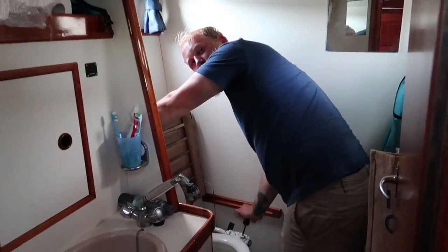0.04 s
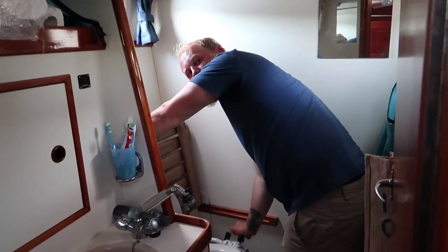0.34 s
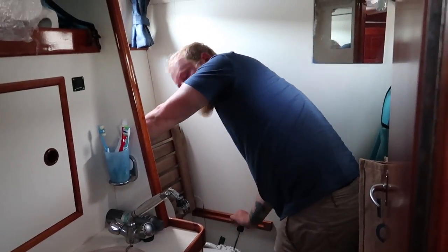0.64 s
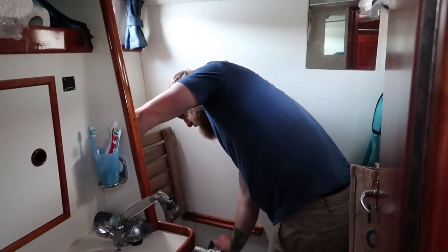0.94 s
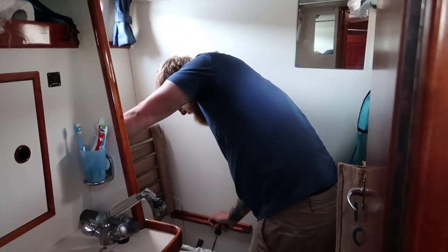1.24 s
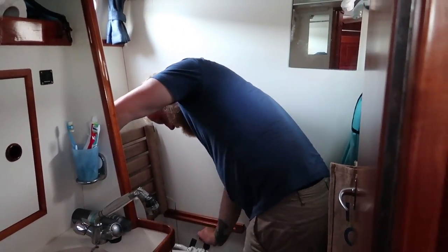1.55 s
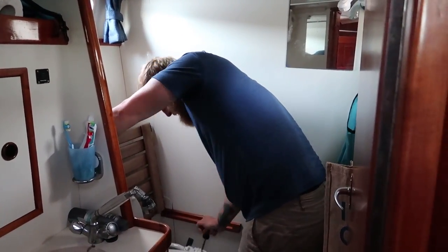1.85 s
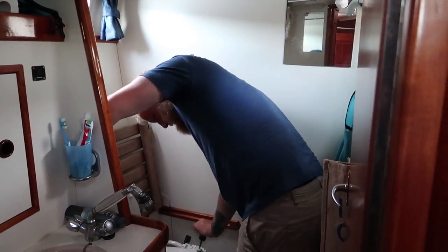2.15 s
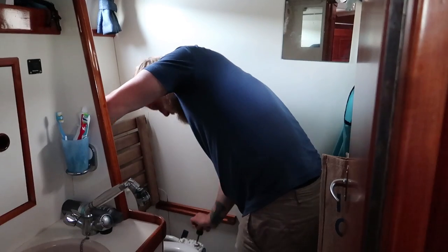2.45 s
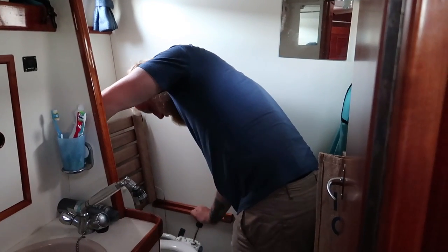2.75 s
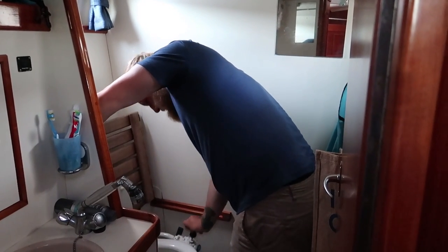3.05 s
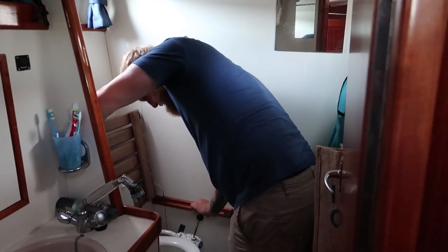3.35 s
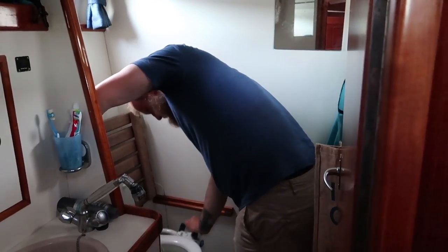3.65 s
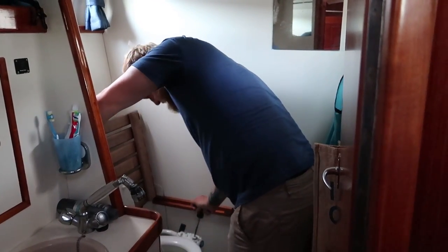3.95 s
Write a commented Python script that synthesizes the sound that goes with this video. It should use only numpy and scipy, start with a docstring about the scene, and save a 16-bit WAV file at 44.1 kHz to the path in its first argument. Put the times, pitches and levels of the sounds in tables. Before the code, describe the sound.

Rhythmic hand pumping of a boat toilet, with wet rasping squirts, slurps, glugs and dull knocks.

```python
"""The hand pump of a boat toilet is worked in a tiny cabin, about three strokes in two seconds.
A valve slurps open, then the first push squirts air and water through it with a rasp, while the
piston seal hisses with speed and water churns in the hose. A big bubble glugs, and the pull sucks
and gurgles in the bowl. Push and pull keep alternating; from the second pull on, the handle sometimes
knocks at the top or the piston thuds at the bottom, each time with a throaty gulp."""
import sys
import numpy as np
from scipy import signal
from scipy.fft import rfft, irfft
from scipy.io import wavfile

SR = 44100
rng = np.random.default_rng(int(sys.argv[2]) if len(sys.argv) > 2 else 0)


def to_wav(s):
    """Save 16-bit WAV."""
    ch = np.atleast_2d(s).T  # columns
    pcm = np.round(np.clip(ch, -1, 1) * 32767)  # PCM
    wavfile.write(sys.argv[1], SR, pcm.astype(np.int16))


N = 176400
TIME = np.arange(N) / SR
BINS_HZ = np.fft.rfftfreq(16384, 1 / SR)

# piston strokes, levels relative within a layer: start_s, fastest_s, end_s, hiss_db, squelch_db, churn_db
PUSH_STROKES = [(0.02, 0.24, 0.37, -40, -32.5, -24), (0.745, 0.992, 1.107, -41, -29.5, -28),
                (1.467, 1.639, 1.85, -40, -32, -29.5), (2.175, 2.319, 2.48, -37.5, -26, -29.5),
                (2.782, 2.987, 3.117, -37.5, -27, -23), (3.397, 3.642, 3.776, -39, -27.5, -23)]
PULL_STROKES = [(0.415, 0.614, 0.8, -43.5, -35.5, -25.5), (1.119, 1.328, 1.494, -44, -31.5, -23),
                (1.83, 2.007, 2.336, -44.5, -32, -22.5), (2.473, 2.666, 2.84, -43, -33.5, -22),
                (3.141, 3.289, 3.465, -42.5, -32, -22), (3.756, 3.964, 4.12, -42.5, -34.5, -23)]
# a valve opens and a slurp breaks through: start_s, level_db, decay_s
VALVE_SLURPS = [(0.0, -37, 0.037), (0.181, -35, 0.034), (0.493, -29.5, 0.027), (1.14, -48, 0.019),
                (1.889, -35, 0.017), (2.249, -25.5, 0.027), (2.51, -38.5, 0.032), (2.885, -31.5, 0.12),
                (3.201, -24.5, 0.017), (3.44, -33, 0.05), (3.809, -30, 0.062)]
# big bubbles in the bowl: loudest_s, length_s, level_db
BOWL_GLUGS = [(0.344, 0.01, -20), (0.55, 0.038, -17), (0.648, .026, -19.5), (0.704, 0.036, -19),
              (1.054, 0.029, -16.5), (1.296, 0.021, -7), (1.752, 0.038, -17.5), (2.215, 0.017, -19.5),
              (2.628, 0.037, -14.5), (3.046, 0.023, -26), (3.845, 0.015, -7)]
# slugs of water heave through the outlet hose: loudest_s, level_db
HOSE_HEAVES = [(.495, -15), (1.279, -23), (1.648, -17), (3.264, -16.5)]
# the handle meets the top stop: start_s, knock_db, click_db
HANDLE_KNOCKS = [(1.4, -12.5, -35), (2.082, -12.5, -31), (2.729, -14.5, -30.5)]
# the piston lands at the bottom: start_s, level_db
PISTON_THUDS = [(2.389, -10.5), (3.707, -15.5)]

# narrow rings of pump barrel and pipe: pitch_hz, width_hz, boost_db
PIPE_RINGS = [(625, 60, 7.5), (775, 32, 10), (1026, 24, 14), (1125, 34, 10), (1742, 24, 6.5), (2358, 26, 8)]
# modes of water, bowl and hose, and of the pump housing on its shelf: pitch_hz, width_hz, level_db
BOWL_MODES = [(94.3, 4.8, -8), (139, 45, -7.5), (173, 15.3, -4), (266, 12.5, -4), (337, 14.5, -9.5),
              (389.2, 19.3, -2), (421.5, 7.3, 0), (782.8, 24, -10.5)]
HOUSING_MODES = [(97, 14.4, 21), (256, 11, 14.5), (313, 14, 16), (647, 125, 6.5), (702, 11, 8.5)]

# tone curves of the valves, seal, hull, stops and background: frequency_hz, level_db
PUSH_SQUELCH_EQ = [(100, -43), (480, -10.5), (650, 5), (900, -5), (1200, -5), (1550, -9.5), (2600, -11),
                   (4500, -22), (9000, -50)]
PULL_SQUELCH_EQ = [(100, -5.5), (480, -7.5), (650, 5), (880, -6.5), (1200, 0), (1550, -5.5), (2600, -19.5),
                   (4500, -24), (9000, -34.5), (15000, -46)]
PUSH_HISS_EQ = [(100, -36), (900, 3.5), (2000, -2.5), (3300, -4.5), (5000, -9.5), (8000, -20), (12000, -25),
                (14000, -33), (15500, -77)]
PULL_HISS_EQ = [(100, -23), (900, 2.5), (2000, 5), (3300, 1.5), (5000, -5), (8000, -14), (12000, -17.5),
                (14000, -26), (15500, -48)]
HULL_RUMBLE_EQ = [(30, -16.5), (70, -3.5), (110, 5.5), (500, -53)]
KNOCK_EQ = [(40, -34), (110, 16.5), (260, -2.5), (420, 4), (500, -3), (700, 6.5), (1000, -7), (1500, -25.5),
            (6000, -47)]
CLICK_EQ = [(200, -41), (1200, 1.5), (4500, -5.5), (15000, -53)]
ROOM_TONE_EQ = [(40, -1.5), (100, 2.5), (200, 1), (500, -9), (1000, -18.5), (3000, -30.5), (12000, -45.5),
                (15000, -74)]
# spread between the ears: frequency_hz, side_minus_mid_db
STEREO_WIDTH = [(70, -57), (330, -23), (650, -28), (1300, -22), (2800, -14), (5500, -8), (9000, -3)]

TREBLE_EDGE_HZ = 15100


def amp(db):
    """Decibels to gain."""
    return 10 ** (np.asarray(db) / 20)


def unit(x):
    """Scales to rms 1."""
    return x / np.sqrt(np.mean(x ** 2) + 1e-20)


def eq(points):
    """Gain per frequency along a tone curve."""
    hz, db = np.transpose(points)
    return amp(np.interp(np.log(BINS_HZ + 1), np.log(hz), db))


def bell(hz, width_hz):
    """Gain per frequency of one resonance."""
    return 1 / np.hypot(1, (BINS_HZ ** 2 - hz ** 2) / (width_hz * BINS_HZ + 1e-9))


def body(modes, top_hz):
    """Gain per frequency of a resonant body: peaks with dark valleys between, fading above top_hz."""
    power = sum(amp(db) ** 2 * bell(hz, 1.4 * width) ** 3 for hz, width, db in modes)
    return np.sqrt(power) / (1 + (BINS_HZ / top_hz) ** 2)


def colour(x, gain):
    """Plays x through a minimum-phase filter of unit energy, shaped like the gain curve."""
    log_gain = np.log(np.maximum(gain / gain.max(), 1e-5))
    mirrored = np.r_[log_gain, log_gain[-2:0:-1]]
    ring = np.fft.ifft(np.exp(np.conj(signal.hilbert(mirrored)))).real[:len(BINS_HZ)]
    return signal.fftconvolve(x, ring / np.linalg.norm(ring))[:N]


def drift(up_to_hz):
    """Smooth random modulation of rms 1."""
    slow = np.fft.rfftfreq(N, 1 / SR) < up_to_hz
    return unit(irfft(rfft(rng.standard_normal(N)) * slow, N))


def pops(per_s, spread_db):
    """A random crackle of bursting bubbles of uneven size."""
    size = amp(spread_db * np.minimum(rng.exponential(1, N), 3))
    return unit(size * rng.choice([-1, 1], N) * (rng.random(N) < per_s / SR))


def flow(strokes, layer, power, late_s, early_s, skew, surge_db=0):
    """A layer's envelope follows a power of the piston's speed; surge_db sharpens the mid-stroke peak."""
    column = ("hiss", "squelch", "churn").index(layer)
    envelope = np.zeros(N)
    for start, fastest, end, *levels_db in strokes:
        travel = np.interp(TIME, [start + late_s, fastest, end - early_s], [0, .5, 1])
        speed = np.abs(np.sin(np.pi * travel ** skew))
        envelope += amp(levels_db[column] - surge_db * np.abs(2 * travel - 1)) * speed ** power
    return envelope


def squelch():
    """Clumps of small bubbles are forced through the valves; under suction the pipe rings hollower."""
    pipe = 1 + sum((amp(db) - 1) * bell(hz, width) ** 2 for hz, width, db in PIPE_RINGS)
    push = flow(PUSH_STROKES, "squelch", power=2.51, late_s=0.004, early_s=0.019, skew=0.94)
    pull = flow(PULL_STROKES, "squelch", power=1.05, late_s=0.018, early_s=0.016, skew=0.76)
    slurp = sum(amp(db) * (TIME > at) * np.exp(-np.abs(TIME - at) / decay)
                for at, db, decay in VALVE_SLURPS)
    suction = pull + slurp
    grain = pops(per_s=1500, spread_db=3.5) * amp(2.97 * drift(37))
    pushed = colour(grain * push, pipe * eq(PUSH_SQUELCH_EQ))
    sucked = colour(grain * suction, pipe ** 1.4 * eq(PULL_SQUELCH_EQ))
    splatter = amp(-5) * bubbles(per_s=300, low_hz=580, high_hz=2100)
    return pushed + sucked + squeal(slurp) + splatter * (push + suction / 2)


def squeal(envelope, pitch_hz=1170, waver_hz=90, level_db=-2.5, octave_db=-7):
    """Air sucked past the wet valve flap gives a rough, wavering note and its octave."""
    phase = 2 * np.pi * np.cumsum(pitch_hz + waver_hz * drift(250)) / SR
    return amp(level_db) * envelope * (np.sin(phase) + amp(octave_db) * np.sin(2 * phase))


def bubbles(per_s, low_hz, high_hz, sizes=36, decay_cycles=10, glide=.07, tilt_db=-10):
    """Single bubbles ring briefly and rise in pitch; the smaller, the higher and fainter."""
    out = np.zeros(N)
    for smallness in (np.arange(sizes) + rng.random(sizes)) / sizes:
        hz = low_hz * (high_hz / low_hz) ** smallness
        age = TIME[:SR // 2] * hz / decay_cycles
        ring = np.sin(2 * np.pi * decay_cycles * age * (1 + glide * age / 2)) * np.exp(-age)
        births = (rng.random(N) < per_s / sizes / SR) * rng.random(N) ** 2
        out += amp(tilt_db * smallness) * signal.oaconvolve(births, ring / np.linalg.norm(ring))[:N]
    return unit(out)


def seal_hiss():
    """Spray and the rubbing piston seal hiss at mid-stroke."""
    push = flow(PUSH_STROKES, "hiss", power=1.12, late_s=0.0029, early_s=0.0066, skew=0.68, surge_db=16)
    pull = flow(PULL_STROKES, "hiss", power=0.8, late_s=0.01, early_s=.005, skew=0.77, surge_db=18)
    grain = amp(6) * pops(per_s=9000, spread_db=2.5) * amp(1.1 * drift(65))
    return colour(grain * push, eq(PUSH_HISS_EQ)) + colour(grain * pull, eq(PULL_HISS_EQ))


def churn(rumble_db=-40):
    """Water tumbles in lumps through bowl and hose in every stroke, and the hull rumbles with it."""
    push = flow(PUSH_STROKES, "churn", power=0.35, late_s=0.018, early_s=0.01, skew=1.32)
    pull = flow(PULL_STROKES, "churn", power=0.42, late_s=0.016, early_s=0.03, skew=0.71)
    lumps = unit(amp(2.3 * drift(22)))
    tumble = pops(per_s=500, spread_db=1.0) * lumps * (push + pull)
    water = colour(tumble, body(BOWL_MODES, top_hz=1100))
    hull = colour(rng.standard_normal(N) * lumps * unit(push + pull), eq(HULL_RUMBLE_EQ))
    return water + amp(rumble_db) * hull


def bloop(loudest_s, hz, length_s, db, rise_share=0.4, fall_share=0.37):
    """A pocket of air swells into a short, wobbling hollow note; gives the note and its envelope."""
    age = np.clip((TIME - loudest_s) / length_s, -6, 6)
    swell = amp(db) * 2 / (np.exp(-age / rise_share) + np.exp(age / fall_share))
    cycles = np.cumsum(hz * (1 + .028 * drift(70))) / SR + rng.random()
    flutter = amp(1.4 * drift(80))
    return swell * flutter * np.sin(2 * np.pi * cycles), swell


def glugs(glug_hz=401, heave_hz=165.6, heave_s=0.02, splash_db=-9):
    """Big bubbles bloop in the bowl and stir its water; slugs of water heave lower in the hose."""
    notes, stir = np.sum([bloop(at, glug_hz, length, db) for at, length, db in BOWL_GLUGS], axis=0)
    heaves = sum(bloop(at, heave_hz, heave_s, db)[0] for at, db in HOSE_HEAVES)
    splash = colour(rng.standard_normal(N) * stir, body(BOWL_MODES, top_hz=TREBLE_EDGE_HZ))
    return notes + heaves + amp(splash_db) * splash


def impact(start_s, decay_s, rise_s):
    """A contact chatters and dies away; the longer the decay, the more energy it carries."""
    age_s = np.maximum(TIME - start_s, 0)
    chatter = rng.choice([-1, 1], N) * (1 - np.exp(-age_s / rise_s)) * np.exp(-age_s / decay_s)
    return chatter * np.sqrt(decay_s * SR / 2) / np.linalg.norm(chatter)


def end_stops():
    """The handle knocks at the top and the piston thuds at the bottom; both set the housing ringing."""
    top = sum(amp(db) * impact(at, decay_s=.02, rise_s=.002) for at, db, _ in HANDLE_KNOCKS)
    bottom = sum(amp(db) * impact(at, decay_s=.018, rise_s=.002) for at, db in PISTON_THUDS)
    click = sum(amp(db) * impact(at, decay_s=.015, rise_s=.0012) for at, _, db in HANDLE_KNOCKS)
    gulps = sum(amp(db) * gulp(at) for at, db, *_ in HANDLE_KNOCKS + PISTON_THUDS)
    housing = colour(bottom + top / 2, body(HOUSING_MODES, top_hz=1140))
    knock = colour((top + bottom) / 2, eq(KNOCK_EQ))
    return housing + knock + colour(click, eq(CLICK_EQ)) + gulps


def gulp(start_s, from_hz=1150, to_hz=400, fall_s=.026, waver_hz=190, low_ratio=.38):
    """Water stopped by a knock gives two rough, throaty, falling resonances; the low one lasts longer."""
    age = np.maximum(TIME - start_s, 0) / fall_s
    hz = to_hz + (from_hz - to_hz) * np.exp(-age)
    high, low = (np.cos(2 * np.pi * ratio * np.cumsum(hz + waver_hz * drift(400)) / SR)
                 for ratio in (1, low_ratio))
    swell = 2 * age * np.exp(1 - 2 * age)
    return amp(-8) * (swell * high + amp(1.5) * swell ** .7 * low)


def cabin_echoes(x, t60_s=0.046, low_cut_hz=530):
    """Close panelled walls throw back a dense, quickly dying cluster of echoes with no bass."""
    t = TIME[:SR // 2]
    taps = rng.standard_normal(len(t)) * (rng.random(len(t)) < .1)
    taps *= (t > .002) * amp(-60 * t / t60_s)
    low_cut = signal.butter(N=6, Wn=low_cut_hz, btype="high", fs=SR, output="sos")
    walls = signal.sosfilt(low_cut, taps / np.linalg.norm(taps))
    return signal.fftconvolve(x, walls)[:N]


def diffuse(x):
    """The same sound with its phases scattered, as it arrives from the side walls."""
    spectra = signal.stft(x, nperseg=256)[2]
    scattered = spectra * np.exp(2j * np.pi * rng.random(spectra.shape))
    return np.sqrt(2) * signal.istft(scattered)[1][:N]


def scene(echo_db=-10, room_tone_db=-39.5):
    """The pump in its cabin over a low room tone; the bass sits in the centre, the treble spreads."""
    pump = seal_hiss() + squelch() + churn() + end_stops() + glugs()
    mid = pump + amp(echo_db) * cabin_echoes(pump)
    mid += amp(room_tone_db) * colour(rng.standard_normal(N), eq(ROOM_TONE_EQ))
    width = eq(STEREO_WIDTH)
    side = np.sqrt(np.mean(width ** 2)) * colour(diffuse(mid), width)
    return np.array([mid + side, mid - side])


def record(dry):
    """Rolls off the sub-bass and cuts the very top of the treble."""
    low_cut = signal.butter(N=2, Wn=32, btype="high", fs=SR, output="sos")
    high_cut = signal.firwin(511, TREBLE_EDGE_HZ, window=("kaiser", 9), fs=SR)
    return signal.oaconvolve(signal.sosfilt(low_cut, dry), high_cut[None], "same")


dry = scene()
out = record(dry)
to_wav(out)
```